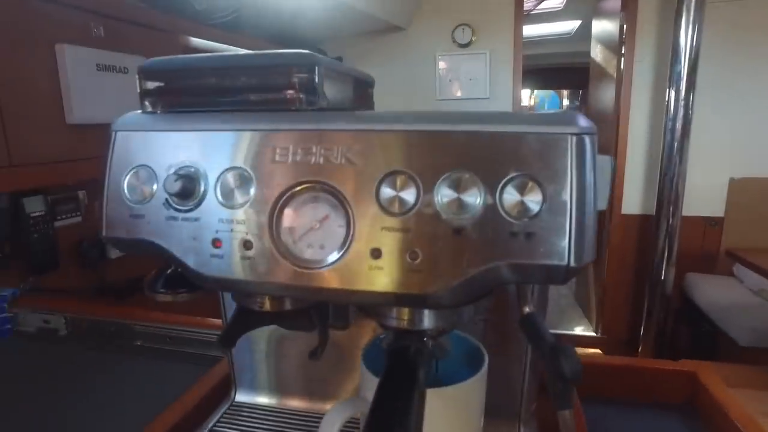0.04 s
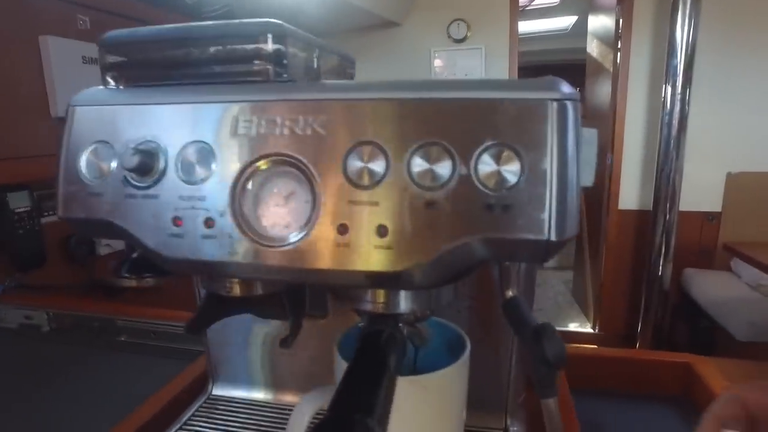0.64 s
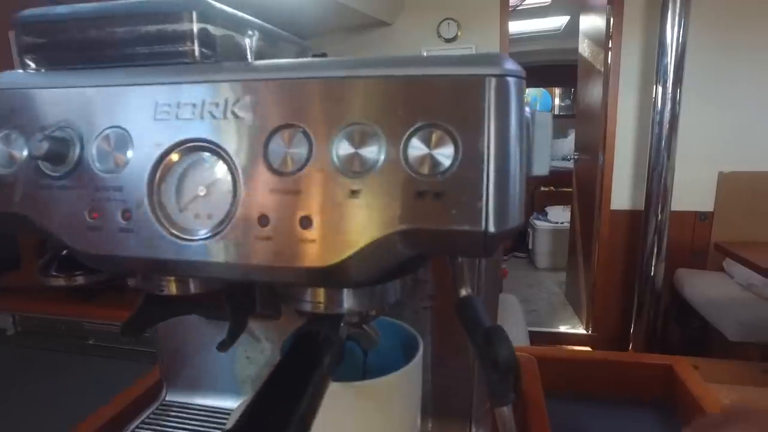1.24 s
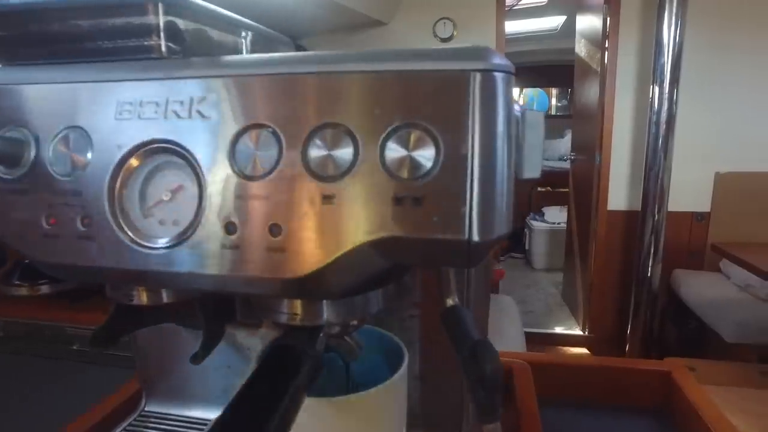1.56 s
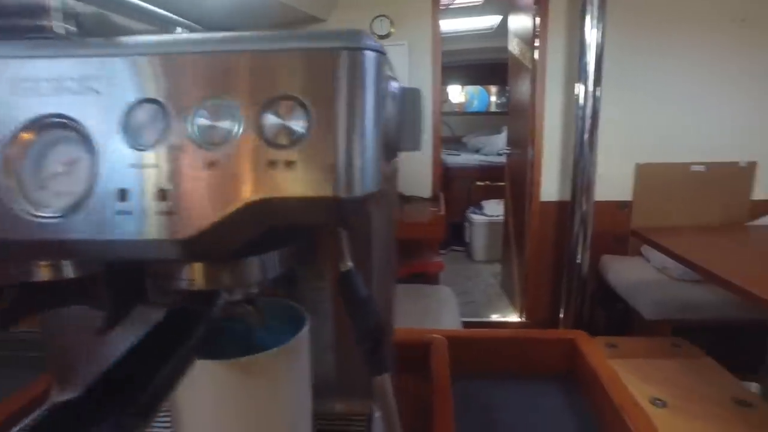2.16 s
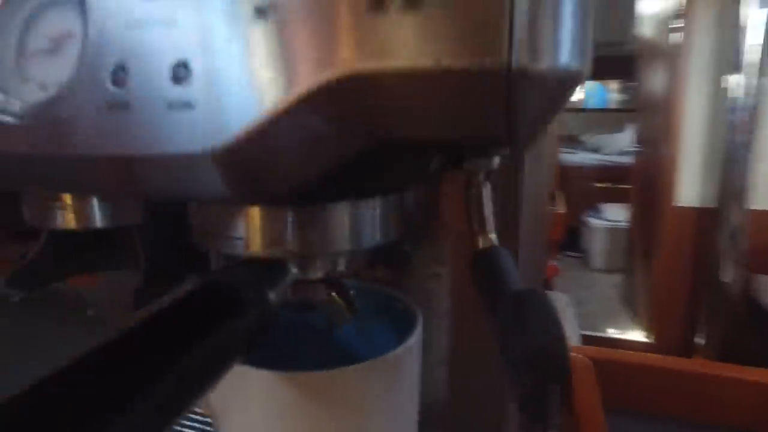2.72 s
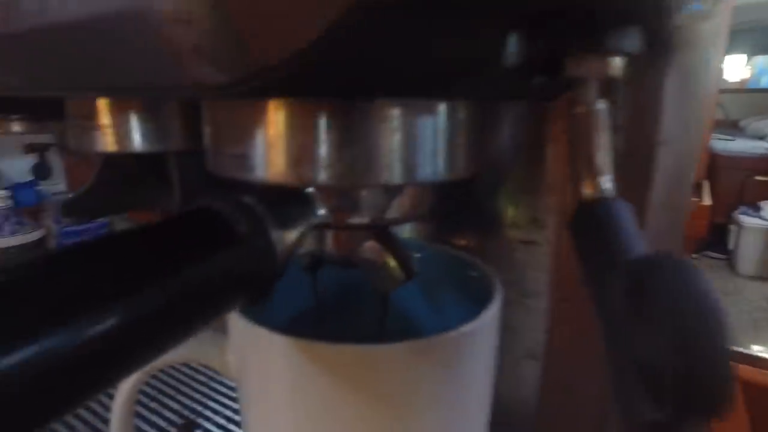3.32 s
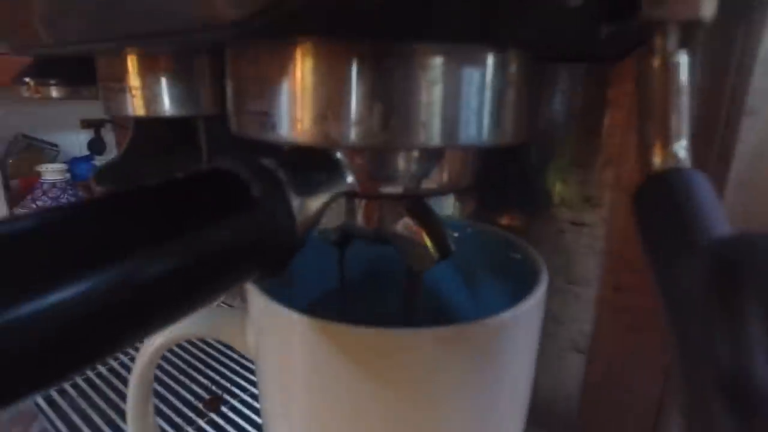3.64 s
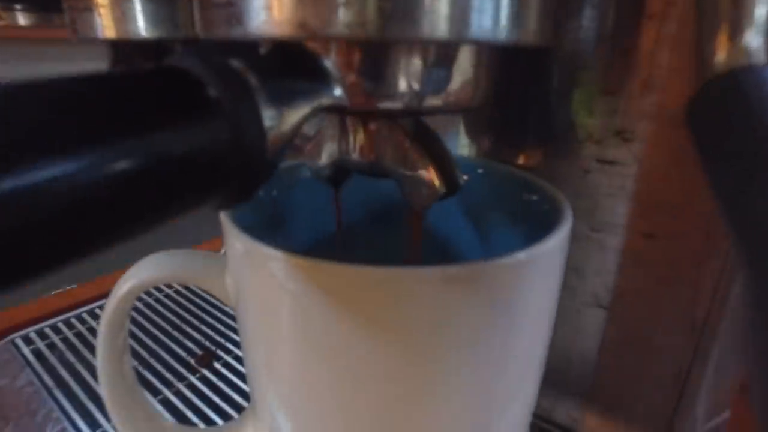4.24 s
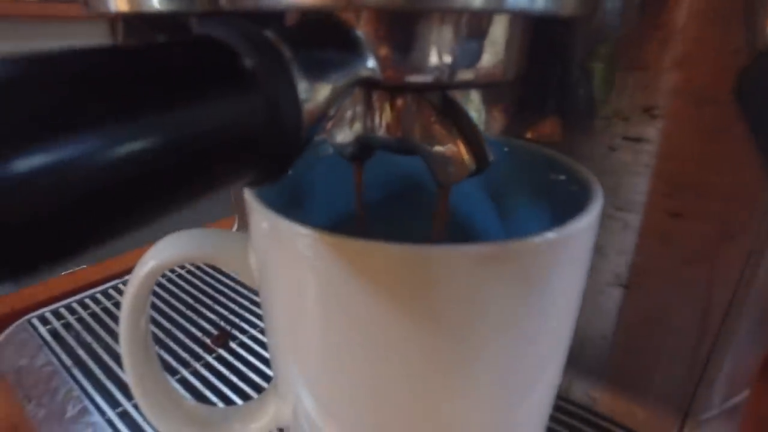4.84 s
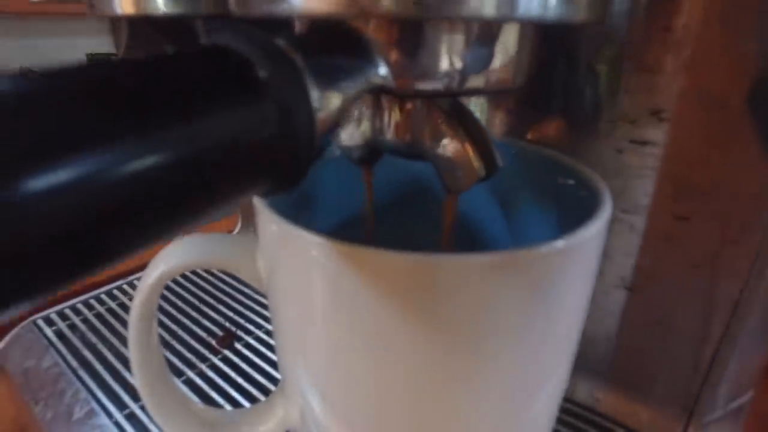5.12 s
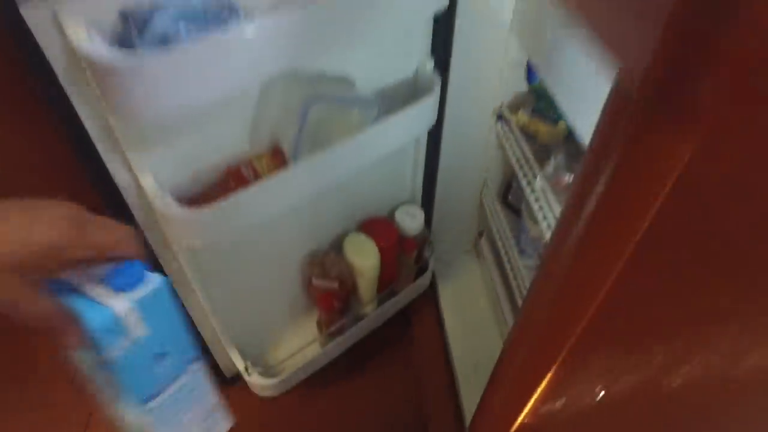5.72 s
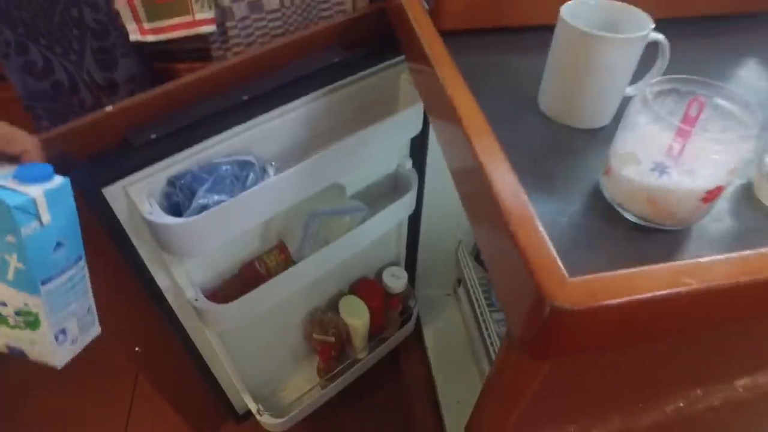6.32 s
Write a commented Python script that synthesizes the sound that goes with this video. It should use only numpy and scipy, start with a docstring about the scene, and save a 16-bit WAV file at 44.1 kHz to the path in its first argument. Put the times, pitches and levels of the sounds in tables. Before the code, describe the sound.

An espresso machine's pump buzzes in three short bursts, then runs on and softens; a milk carton scrapes and bumps out of a fridge door.

```python
"""Espresso and milk in a boat galley

In a small wooden galley, an espresso machine's vibrating pump gives three short bursts, then runs on.
Each piston stroke thumps the casing and rattles the steel panels; as pressure builds, the rattle dies
and a valve hisses. The scene then jumps to the humming fridge, with the pump further off, where a milk
carton is pulled from the door and set on the counter."""
import sys
import numpy as np
from scipy import signal
from scipy.fft import rfft, irfft
from scipy.io import wavfile

SR = 44100
rng = np.random.default_rng(int(sys.argv[2]) if len(sys.argv) > 2 else 0)


def log_audio(samples):
    """Write samples as a 16-bit WAV file to the path given in sys.argv[1]."""
    # one column per channel
    frames = np.atleast_2d(samples).T
    # limit to full scale, then quantise
    limited = np.clip(frames, -1, 1)
    pcm = np.round(limited * 32767).astype(np.int16)
    wavfile.write(sys.argv[1], SR, pcm)


N = 290178
T = np.arange(N) / SR
STROKE_HZ = 50.07  # piston strokes per second
JUMP_S = 5.325  # the scene moves from the machine to the fridge
ANSWER_CYCLES = 4.017  # a ringing note takes a few cycles to answer a blow

# Each run of the pump, with its levels before pressure builds; the last is heard from the fridge.
# (start [s], stop [s], time to draw water [s], lead the piston gains [s],
#  mount [dB], casing [dB], panels [dB], treble [dB])
RUNS = [(0.358, .83, 0.04, 0.0013, -44.5, -29, -33.5, -29.5),
        (1.356, 1.83, 0.25, -0.00081, -35, -31.5, -30.5, -29),
        (2.3366, 2.83, 0.17, 0.0018, -36.5, -25.5, -30.5, -29),
        (3.337, 5.325, 0.017, .002, -34, -26, -28, -28.5),
        (5.384, 6.58, .02, 0.0024, -42.5, -49, -38.5, -42.5)]


def pump():
    """Piston strokes shake the whole machine; under pressure the steel clatter gives way to a valve."""
    strokes = stroke_times()
    mount_db, casing_db, panel_db, treble_db = pump_levels()
    loaded = ramp(pressure_at(T), middle=0.33, width=0.39)  # 0 running free, 1 under load
    # from further off, echoes fill the gaps between strokes
    echoes, echo_share = rng.standard_normal(N), 0.23 * (T > JUMP_S)
    body = mount(strokes, mount_db, loaded) + casing(strokes) * undb(casing_db)
    rattle = panels(strokes, panel_db, loaded, echoes, echo_share)
    ringing = housing(strokes - 0.0008) + passing_notes(strokes - 0.0008)
    squeak = squeaks(strokes - 0.0005) * undb(treble_db)
    treble = blend(clatter(strokes, treble_db), valve(strokes, treble_db, echoes, echo_share), loaded)
    return body + rattle + ringing + squeak + treble


def mount(strokes, level_db, loaded):
    """The pump's heavy mount answers each stroke late, shaking loosely until the load steadies it."""
    # The mount's tone when steady and when loose: (pitch [Hz], level [dB])
    steady_tone = [(60, -43.5), (100, -37.5), (150, -13.5), (200, -6.5), (240, -2), (260, 10), (300, 0),
                   (350, -6.5), (400, -6.5), (460, -21.5), (700, -49.5), (1500, -62)]
    loose_tone = [(80, -44), (160, -2), (250, -8.5), (350, 0), (470, 3.5), (600, -23), (900, -39)]
    drone = colour(thumps(strokes + 0.00456, scatter_db=1.5) * undb(level_db), steady_tone)
    shake = chatter(strokes + 0.0031, rise=0.0019, decay=0.012, tail_db=-9, tail_s=0.006,
                    repeat=0.743, scatter_db=1.5)
    return blend(colour(shake * undb(level_db), loose_tone), drone, 0.77 + 0.27 * loaded)


def casing(strokes):
    """The hollow casing booms at each stroke and nearly dies away before the next."""
    # The notes in one boom: (pitch [Hz], decay [s], level [dB])
    notes = [(598, .0072, 0), (505, .007, -11), (960, .005, -19)]
    t, rise = T[:SR // 20], 0.00353
    boom = sum(undb(db) * swell(t, rise, decay) * np.sin(2 * np.pi * hz * (t - rise))
               for hz, decay, db in notes)
    return train(strokes + 0.00025, np.tile(boom, (len(strokes), 1)), scatter_db=1.14)


def panels(strokes, level_db, loaded, echoes, echo_share):
    """The panels knock hard while the pump runs free, and give a long, soft buzz under pressure."""
    # The tone of the rattling panels: (pitch [Hz], level [dB])
    tone = [(380, -21.5), (700, -5), (900, -5.5), (1280, -6.5), (1480, -4.5), (1680, -2.5), (1970, -3),
            (2560, -3.5), (2850, -5), (3190, -3.5), (3500, -16.5), (3950, -21), (5200, -50.5)]
    knock = chatter(strokes - 0.001, rise=0.0042, decay=0.0031, tail_db=-2, tail_s=0.016,
                    repeat=0.8, scatter_db=1.2)
    buzz = chatter(strokes - 0.005, rise=0.0068, decay=0.019, tail_db=-6, tail_s=0.027,
                   repeat=0.76, scatter_db=1.2)
    rattle = blend(knock * undb(-7), buzz * undb(-3.5), loaded)
    return colour(blend(rattle, echoes, echo_share) * undb(level_db), tone)


def clatter(strokes, level_db):
    """The piston strikes steel, then brushes it again on its way back."""
    # The bright tone of the steel: (pitch [Hz], level [dB])
    tone = [(2060, -40.5), (3500, -13.5), (4000, -8.5), (4330, -7.5), (4600, -5), (4750, -7), (4880, -3),
            (5020, -7.5), (5150, -7), (5290, -6.5), (5520, -7.5), (5700, -3), (5870, -7), (6100, -6.5),
            (6350, -7), (6840, -15), (7200, -15.5), (7550, -20.5), (7850, -19), (8780, -25), (9050, -23.5),
            (9400, -31.5), (10900, -49.5), (13900, -40.5), (15000, -57)]
    strike = chatter(strokes - 0.002, rise=0.0049, decay=0.0045, tail_db=-8, tail_s=0.017,
                     repeat=0.52, scatter_db=0.5)
    brush = chatter(strokes + 0.011, rise=0.004, decay=0.009, tail_db=-26, tail_s=0.008,
                    repeat=0.4, scatter_db=1.5)
    return colour((strike + brush * undb(-11)) * undb(level_db - 2.5), tone)


def valve(strokes, level_db, echoes, echo_share):
    """The valve spurts once per stroke, hissing and making its own metal ring."""
    # The tone of the hiss: (pitch [Hz], level [dB])
    hiss_tone = [(2120, -41), (2600, -2), (3000, -25), (3600, -28), (3800, -13), (4280, 1), (4650, 8),
                 (5030, -5), (5280, 7.5), (5870, -6.5), (6270, 1), (7410, 1), (7820, -2), (9190, -8.5),
                 (11300, -26.5), (14100, -31), (15000, -59)]
    # The metal's ringing notes: (pitch [Hz], width [Hz], level [dB])
    metal_notes = [(4040, 300, -17), (4170, 270, -9.5), (4450, 85, -11.5), (4850, 75, -10), (5100, 150, -9),
                   (5360, 73, -7.5), (5590, 56, -17.5), (6160, 140, -8), (6520, 46, -14),
                   (6920, 200, -12.5), (7215, 90, -12.5), (8010, 68, -25), (8850, 87, -19.5)]
    # it opens just before the piston lands, a little later at full pressure
    opens = strokes - 0.0088 + 0.0036 * pressure_at(strokes)
    spurts = chatter(opens, rise=0.0036, decay=0.0094, tail_db=-15, tail_s=0.011,
                     repeat=0.59, scatter_db=0.2)
    spurts = blend(spurts, echoes, echo_share) * undb(level_db)
    metal = sum((-1) ** k * undb(db) * ring(spurts, hz, width)
                for k, (hz, width, db) in enumerate(metal_notes))
    return colour(spurts, hiss_tone) * undb(-6.5) + metal * undb(-2.5)


def housing(strokes):
    """Every blow rings the same notes in the housing; pressure cushions it, the high notes most."""
    # The housing's ringing notes: (pitch [Hz], width [Hz], level [dB])
    notes = [(766, 42, -18), (875.5, 50, -12), (987.5, 47, -13.5), (1275, 56, -15), (1347, 90, -18),
             (1679, 100, -13), (1953, 59, -16), (2155, 36, -28.5), (2327, 90, -17), (2590, 23, -24.5),
             (2670, 90, -26), (3070, 48, -16.5), (3280, 89, -19.5), (3910, 64, -18.5), (4210, 150, -19)]
    cushion_db_per_khz = -14.5 * pressure_at(T)
    *_, panel_db, _ = current_run()
    blow_db = panel_db - 10 * shortening()
    sound = 0
    for k, (hz, width, db) in enumerate(notes):
        strength = undb(blow_db + db + cushion_db_per_khz * hz / 1000)
        blows = thumps(strokes + ANSWER_CYCLES / hz, scatter_db=4) * strength
        sound += (-1) ** k * ring(blows, hz, width)
    return sound


def passing_notes(strokes):
    """As the load shifts, single ringing notes stand out for a few strokes and fade."""
    # The notes that swell: (loudest at [s], half length [s], pitch [Hz], width [Hz], level [dB])
    notes = [(1.79, .1, 500, 70, -39), (2.52, .13, 500, 70, -37.5), (3.42, .07, 490, 70, -33),
             (3.8, .25, 500, 70, -39), (.72, .15, 2550, 65, -42), (.5, .2, 4100, 200, -38),
             (1.53, .17, 3290, 110, -37), (2.43, .12, 2020, 150, -36), (3.48, .13, 3150, 110, -35),
             (3.48, .15, 1680, 90, -38), (3.48, .1, 5530, 130, -33), (4.07, .12, 1700, 220, -45.5),
             (4.05, .12, 1270, 100, -46), (4, .17, 930, 150, -42), (.65, .2, 690, 80, -41)]
    sound = 0
    for peak, length, hz, width, db in notes:
        strength = undb(db) * np.exp(-((T - peak) / length) ** 2)
        sound += ring(thumps(strokes + ANSWER_CYCLES / hz, scatter_db=0.9) * strength, hz, width)
    return sound


def squeaks(strokes):
    """Strokes ring a short high note, never quite the same, that swells, glides and fades in spells."""
    # Squeaky spells: (loudest at [s], half length [s], pitch [Hz], glide [Hz/s], level over treble [dB])
    spells = [(.63, 0.35, 5500, 711, -7), (1.83, 0.28, 5620, 297, -6.5), (2.502, .045, 5750, 896.5, -1.5),
              (2.613, 0.065, 5570, 3802, 2), (2.736, 0.098, 5820, -1500, -3), (3.472, 0.085, 4830, 0, -3)]
    peak, length, pitch, glide, db = np.transpose(spells)
    from_peak = strokes[:, None] - peak
    strength = undb(db) * np.exp(-(from_peak / length) ** 2)
    pitches = pitch + glide * np.clip(from_peak, -length, length)
    hz = pitches[np.arange(len(strokes)), strength.argmax(axis=1)]  # the loudest spell sets the pitch
    hz *= 1 + 0.03 * rng.standard_normal(len(strokes))
    t = T[:SR // 20]
    phase = rng.random((len(strokes), 1))
    notes = swell(t, rise=0.0026, decay=0.0015) * np.sin(2 * np.pi * (hz[:, None] * t + phase))
    return train(strokes, notes, scatter_db=3.7) * np.interp(T, strokes, strength.max(axis=1))


def stroke_times():
    """The piston lands once per cycle of mains power, unsteadily at first, then creeps into place."""
    jitter_s, stumble_s, steadying_s, creep_s = 0.000015, 0.0003, 0.059, 0.45
    times = []
    for start, stop, _, lead, *_ in RUNS:
        age = np.arange(0, stop - start, 1 / STROKE_HZ)
        early = lead * (1 - np.exp(-age / creep_s))
        spread = jitter_s + stumble_s * np.exp(-age / steadying_s)
        times.append(start + age - early + spread * rng.standard_normal(len(age)))
    return np.concatenate(times)


def pump_levels():
    """An empty pump pushes less and rattles more; pressure drives the mount and quiets the rattle."""
    # Level changes as the listener shifts beside the cup: (time [s], casing [dB], treble [dB])
    beside_cup = [(4, -5.5, 2.5), (4.25, -4, 3.5), (4.7, -4, 3.5), (5.13, -4, 0.5), (5.3, -1.5, -0.5)]
    cup_casing_db, cup_treble_db = curves(beside_cup)
    start, _, draw_s, _, mount_db, casing_db, panel_db, treble_db = current_run()
    empty = np.clip(1 - (T - start) / draw_s, 0, 1)
    pressure, short = pressure_at(T), shortening()
    return (mount_db - 3.5 * empty + 4 * pressure - 8.5 * short,
            casing_db - 10.5 * empty - 4 * short + cup_casing_db,
            panel_db + 2.5 * empty - 25 * pressure,
            treble_db - 10.5 * pressure + cup_treble_db)


def pressure_at(t):
    """Pressure (0 to 1) builds behind the coffee once it is soaked, quickly at first."""
    soaked_s, build_s = 3.434, 0.69
    return 1 - np.exp(-np.maximum(t - soaked_s, 0) / build_s)


def shortening():
    """At high pressure the stroke shortens and thumps less: 0 is a full stroke, 1 a short one."""
    return ramp(pressure_at(T), middle=0.637, width=0.11)


def current_run():
    """The columns of the pump run that applies at each moment."""
    rows = np.array(RUNS)
    return rows[np.searchsorted(rows[1:, 0], T + 1 / STROKE_HZ)].T


def carton():
    """Cardboard scrapes along the plastic shelf and bumps shelf, door and counter; the milk gurgles."""
    # Slides along the shelf: (start [s], rise [s], decay [s], hollow body [dB], bright scrape [dB])
    slides = [(5.365, 0.033, 0.035, -38.5, -39.5), (5.497, 0.017, 0.093, -46, -37.5),
              (5.585, 0.021, 0.023, -56, -38), (5.754, 0.019, 0.016, -27, -25.5)]
    # The carton's knocks: (start [s], decay [s], hollow body [dB], bright scrape [dB])
    knocks = [(5.429, 0.04, -40, -43.5), (5.490, 0.0063, -32.5, -26.5), (5.516, 0.014, -26.5, -56),
              (5.541, 0.036, -34, -48), (5.740, 0.009, -51, -34.5), (5.78, 0.019, -25.5, -62),
              (6.519, .004, -35, -43)]
    # Hollow notes of the bumps, and two small gurgles of milk:
    # (start [s], pitch [Hz], level [dB], rise [s], decay [s])
    bumps_and_gurgles = [(5.429, 258, -20, 0.021, 0.01), (5.43, 132, -38.5, 0.0092, 0.028),
                         (5.430, 532, -23, 0.0026, 0.0055), (5.515, 393, -25.5, 0.0084, 0.0044),
                         (5.541, 251, -31.5, 0.0077, 0.017), (5.61, 1058, -42, 0.011, 0.01),
                         (5.68, 1110, -41.5, 0.0089, 0.0047), (6.522, 617, -29, 0.0027, 0.0045)]
    # The tones of the carton and the shelf: (pitch [Hz], level [dB])
    cardboard = [(88, -29), (150, -11), (221, -5), (429, -0.5), (1180, -7), (1290, -9.5), (1400, -12),
                 (1800, -10.5), (2110, -17.5), (3600, -20), (4680, -34), (7920, -120)]
    plastic = [(1650, -19.5), (2800, -27), (3070, -15), (4030, -9.5), (5190, 0), (7230, -9), (9170, -19),
               (12700, -29), (14100, -42), (15000, -65)]
    knock_rise_s = 0.0032
    touches = list(slides) + [(start, knock_rise_s, *rest) for start, *rest in knocks]
    body = scrape = notes = 0
    for start, rise, decay, body_db, scrape_db in touches:
        touch = swell(T - start, rise, decay)
        body += undb(body_db) * touch
        scrape += undb(scrape_db) * touch
    for start, hz, db, rise, decay in bumps_and_gurgles:
        age = T - start
        notes += np.sqrt(2) * undb(db) * swell(age, rise, decay) * np.sin(2 * np.pi * hz * age)
    grain = undb(0.97 * wander(400))
    hollow = colour(body * grain * rng.standard_normal(N), cardboard)
    bright = colour(scrape * grain * rng.standard_normal(N), plastic)
    return notes + hollow + bright


def small_sounds():
    """Milk sloshing in the carton, a light clink and brief rustles: puffs of noise around one pitch."""
    # The faint small sounds: (start [s], pitch [Hz], level [dB])
    events = [(0.278, 863, -55), (1.245, 9000, -58.5), (2.07, 5500, -66), (3.045, 3020, -49),
              (5.845, 965, -47), (5.905, 2900, -51.5), (6.1, 1110, -55), (6.23, 1120, -48)]
    sound = 0
    for start, hz, db in events:
        puff = undb(db) * swell(T - start, rise=0.0084, decay=0.015) * rng.standard_normal(N)
        sound += colour(puff, [(hz / 10, -60), (hz / 2, -25), (hz, 0), (hz * 2, -30), (hz * 10, -60)])
    return sound


def fridge():
    """The compressor hums and wavers slightly; after the jump the open fridge adds its own drone."""
    # The notes in the hum: (pitch [Hz], level [dB])
    notes = [(42, -19), (120, -10), (179.6, 2), (241, -10.5), (299.6, -4), (359.5, -8), (479, -25),
             (640, -17)]
    # The hum's level, changing with the listener's distance: (time [s], level [dB])
    nearness = [(0, -59), (4, -53), (6, -53.5)]
    hum = 0
    for hz, db in notes:
        strength = undb(db + 0.81 * wander(5.7))
        hum += strength * np.sin(2 * np.pi * (hz * T + rng.random()) + 0.53 * wander(4))
    drone_hz = 121.7
    drone = (T > JUMP_S) * undb(-56.5 + 1.1 * wander(13)) * np.sin(2 * np.pi * drone_hz * T)
    return np.sqrt(2) * (hum * undb(curves(nearness)[0]) + drone)


def cabin_air():
    """A soft, low rush of air, a little louder by the fridge."""
    # The tone of the air: (pitch [Hz], level [dB])
    tone = [(25, -50), (45, -6), (72, -18), (140, -12.5), (300, -16.5), (450, -24.5), (650, -24),
            (1000, -32), (3200, -38), (3700, -32), (4000, -37.5), (6200, -38), (9000, -53), (15000, -47.5)]
    level_db = np.where(T < JUMP_S, -56, -53.5) + 0.62 * wander(3.5)
    return colour(rng.standard_normal(N), tone) * undb(level_db)


def galley(x):
    """Close wooden walls add a short, dense echo above the bass."""
    fade_s, echo_db = 0.16, -5.5  # the echo falls by 60 dB in fade_s
    t = T[:SR // 2]
    tail = rng.standard_normal(len(t)) * swell(t - 0.004, rise=0.007, decay=fade_s / np.log(1000))
    echo = signal.fftconvolve(x, tail / np.linalg.norm(tail))[:N]
    return x + undb(echo_db) * colour(echo, [(200, -16), (620, -11), (1000, -3), (6000, -14), (14000, 0)])


def train(times, shapes, scatter_db):
    """Place one short sound at each stroke, each a little louder or softer; average power near 1."""
    track = np.zeros(N + SR)
    sizes = undb(scatter_db * rng.standard_normal(len(times)))
    for start, shape, size in zip(times, shapes, sizes):
        i = int(start * SR)
        track[i:i + len(shape)] += size * shape
    stroke_energy = np.mean(np.sum(shapes ** 2, axis=1))
    return track[:N] * np.sqrt(SR / STROKE_HZ / stroke_energy)


def thumps(times, scatter_db):
    """One clean push per stroke."""
    return train(times, np.ones((len(times), 1)), scatter_db)


def chatter(times, rise, decay, tail_db, tail_s, repeat, scatter_db):
    """A burst of tiny taps per stroke; repeat (0 to 1) says how alike one burst is to the next."""
    t = T[:SR // 20]
    taps = rng.standard_normal((len(times), len(t)))
    for k in range(1, len(times)):
        taps[k] = repeat * taps[k - 1] + np.sqrt(1 - repeat ** 2) * taps[k]
    loudness = swell(t, rise, decay) + undb(tail_db) * swell(t, rise, tail_s)
    return train(times, taps * loudness, scatter_db)


def ring(x, hz, width):
    """Let x ring one note; the smaller the width [Hz], the longer it rings."""
    r = np.exp(-np.pi * width / SR)
    feedback = [1, -2 * r * np.cos(2 * np.pi * hz / SR), r * r]
    return signal.lfilter([1, 0, -1], feedback, x) * np.sqrt((1 - r * r) / 2)


def colour(x, points, size=4096):
    """Give x the tone drawn by (pitch [Hz], level [dB]) points; white noise keeps its power."""
    hz, db = np.transpose(points)
    grid = np.maximum(np.fft.rfftfreq(size, 1 / SR), 1)
    gains = undb(np.interp(np.log(grid), np.log(hz), db))
    # this folding makes the peaks ring after a sound, never before it
    cepstrum = irfft(np.log(gains))
    cepstrum[1:size // 2] *= 2
    cepstrum[size // 2 + 1:] = 0
    response = irfft(np.exp(rfft(cepstrum)))
    return signal.fftconvolve(x, response / np.linalg.norm(response))[:N]


def swell(t, rise, decay):
    """A smooth rise, then a fall that dies away; times in seconds."""
    return np.sin(np.pi / 2 * np.clip(t / rise, 0, 1)) ** 2 * np.exp(-np.maximum(t - rise, 0) / decay)


def wander(rate):
    """A random drift of about 1 either way, with `rate` new values a second."""
    knots = rng.standard_normal(int(N / SR * rate) + 2)
    return np.interp(T * rate, np.arange(len(knots)), knots)


def blend(a, b, share):
    """Fade from a to b at constant power as share goes from 0 to 1."""
    share = np.clip(share, 0, 1)
    return a * np.sqrt(1 - share) + b * np.sqrt(share)


def ramp(x, middle, width):
    """Go from 0 to 1 as x passes the middle."""
    return np.clip(0.5 + (x - middle) / width, 0, 1)


def curves(rows):
    """Join a table's values by straight lines in time."""
    times, *columns = np.transpose(rows)
    return [np.interp(T, times, column) for column in columns]


def undb(db):
    """Turn decibels into a factor to multiply by."""
    return 10 ** (np.asarray(db) / 20)


def scene():
    """Pump, carton and faint small sounds echo in the galley, over the fridge's hum and the air."""
    return (galley(pump() + carton() + small_sounds()) + fridge() + cabin_air())[None]


def record(dry):
    """The level dips briefly at the jump to the fridge, and the highest treble is cut."""
    recovery_db = np.interp(T, [JUMP_S, JUMP_S + 0.052, JUMP_S + 0.077], [-20, -6, 0])
    dip_db = np.where(T < JUMP_S, 0, recovery_db)
    top_hz = 14900
    treble_cut = signal.ellip(8, 0.2, 70, top_hz, fs=SR, output="sos")
    return signal.sosfilt(treble_cut, dry * undb(dip_db))


dry = scene()
out = record(dry)
log_audio(out)
```